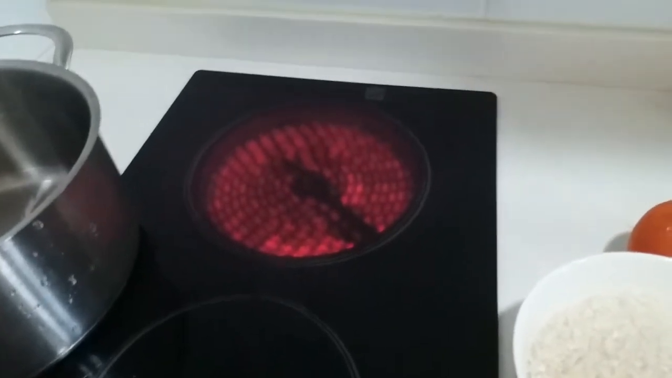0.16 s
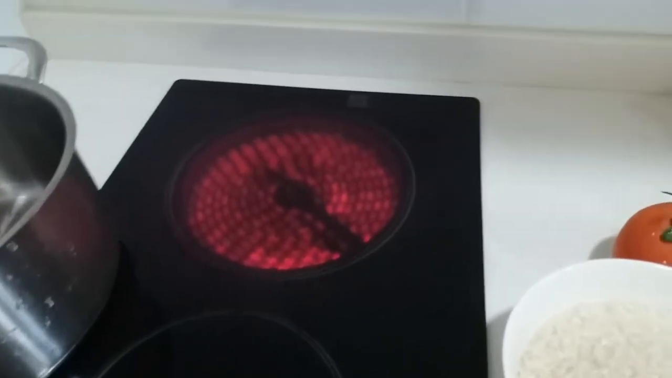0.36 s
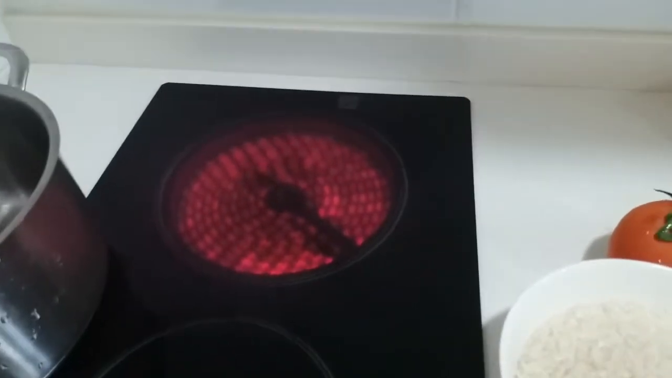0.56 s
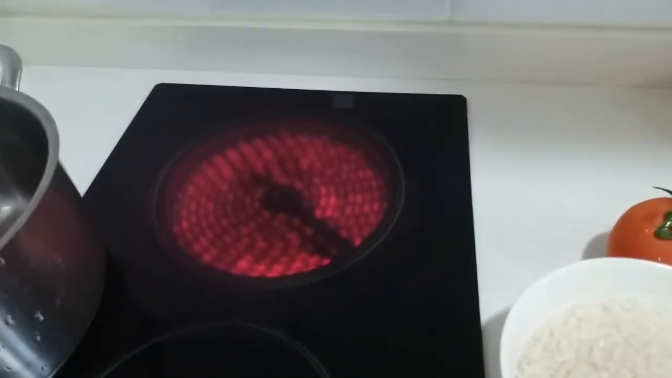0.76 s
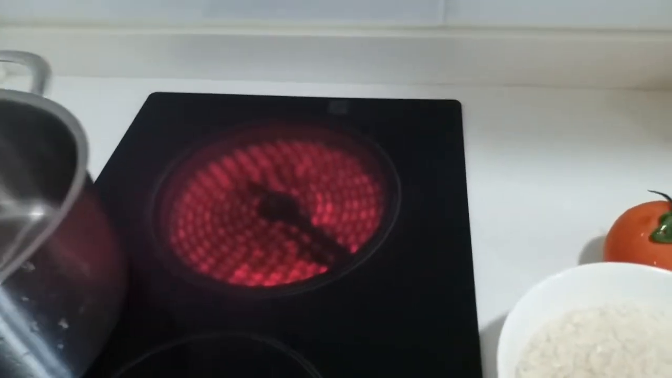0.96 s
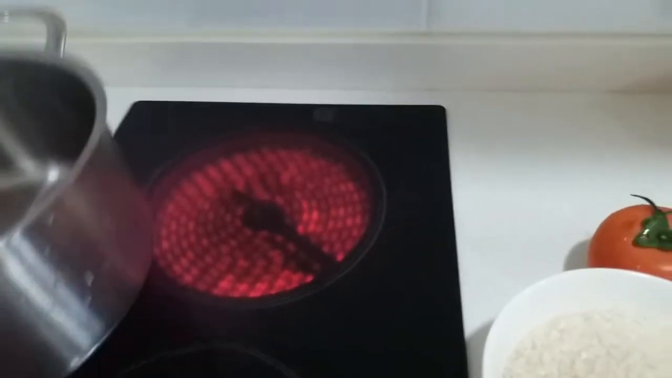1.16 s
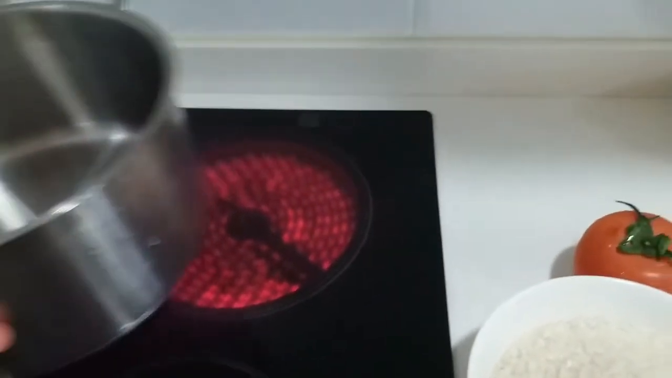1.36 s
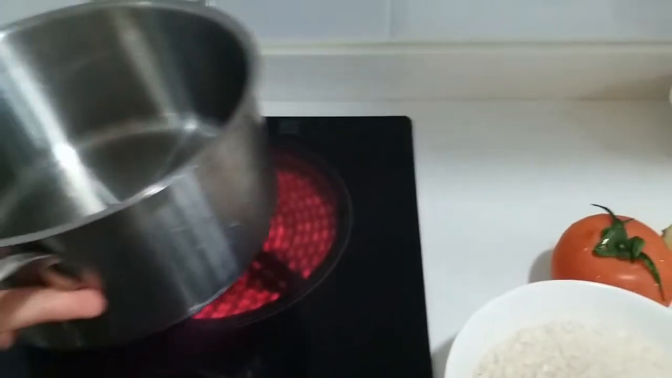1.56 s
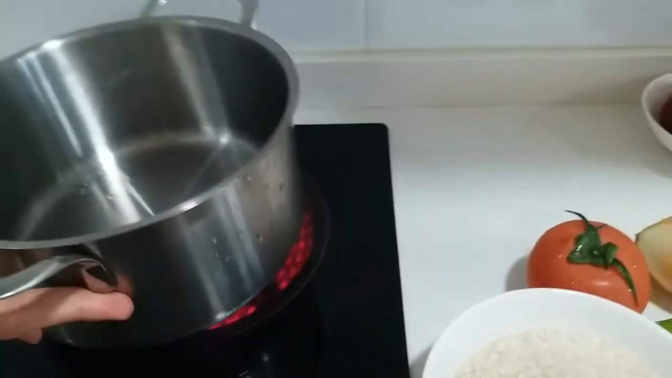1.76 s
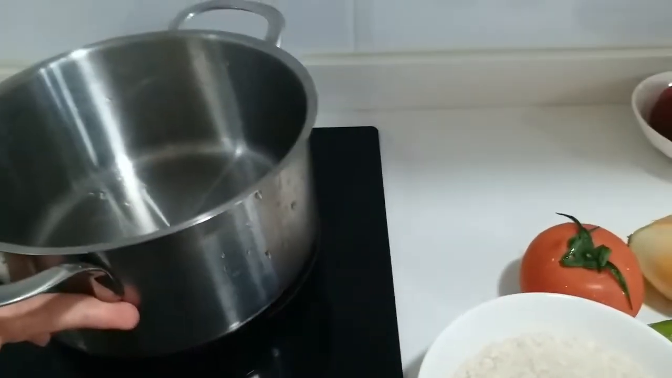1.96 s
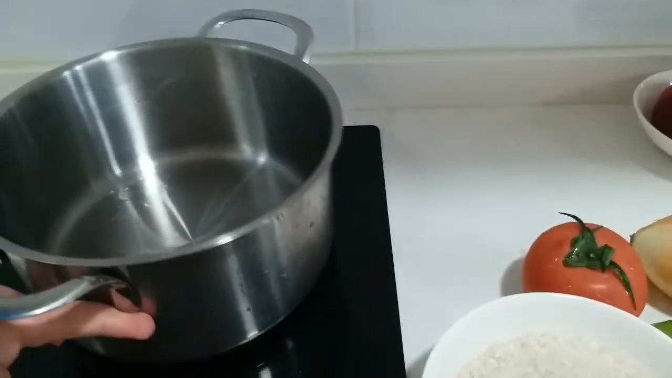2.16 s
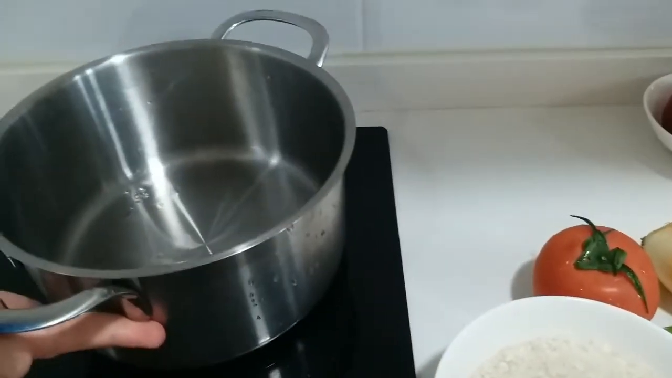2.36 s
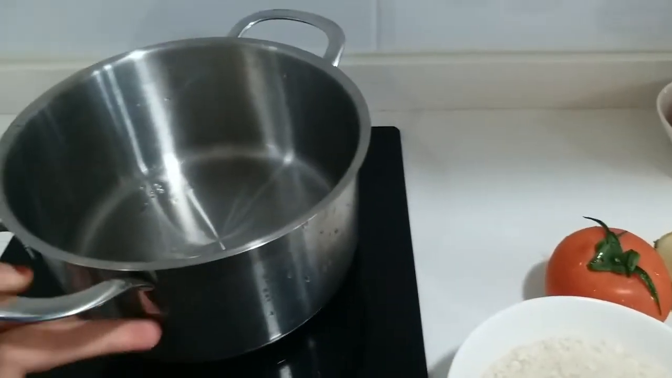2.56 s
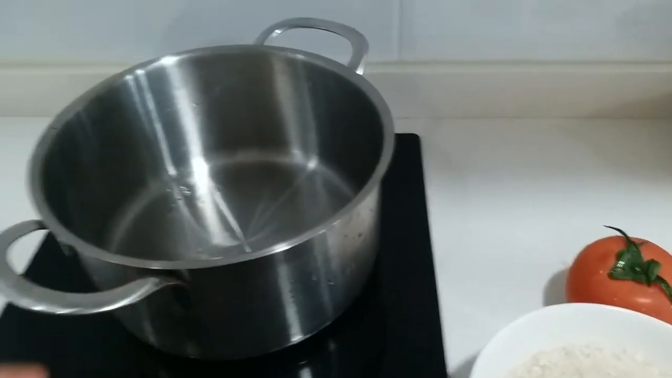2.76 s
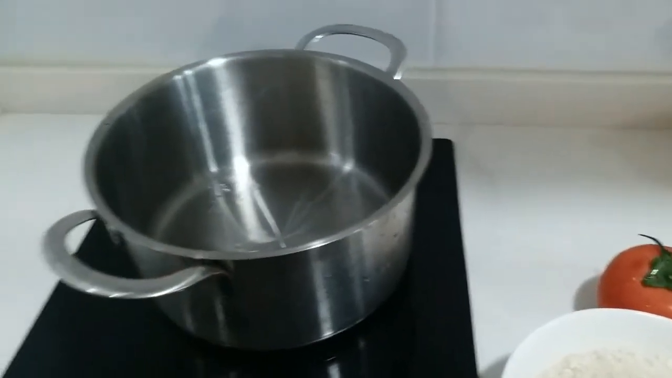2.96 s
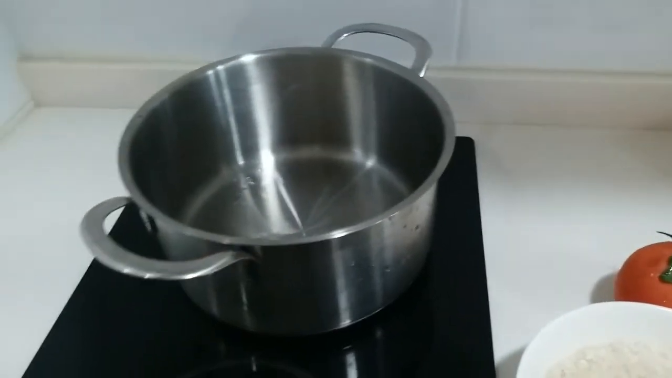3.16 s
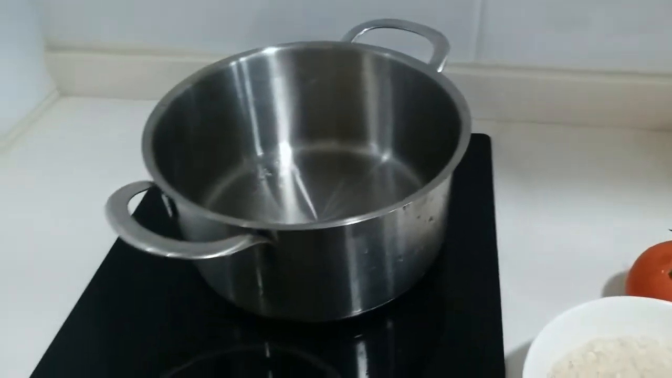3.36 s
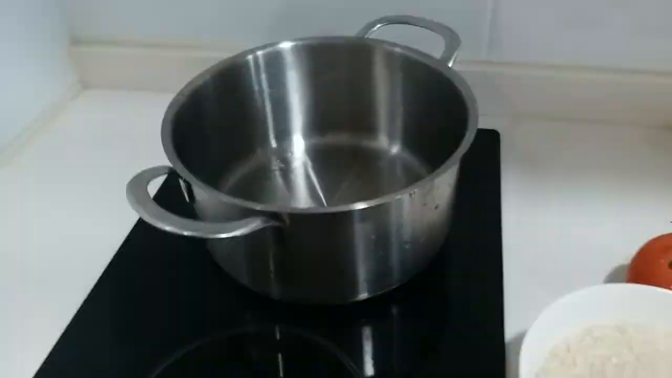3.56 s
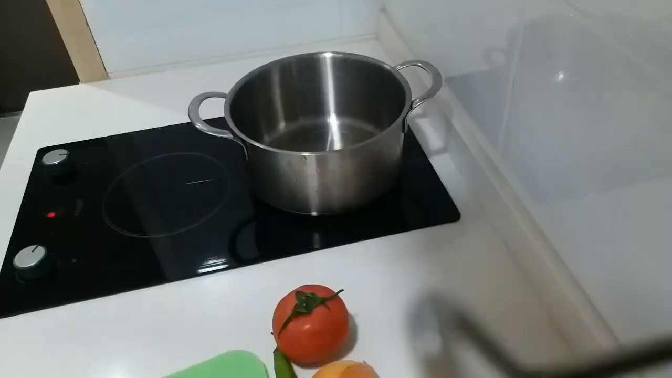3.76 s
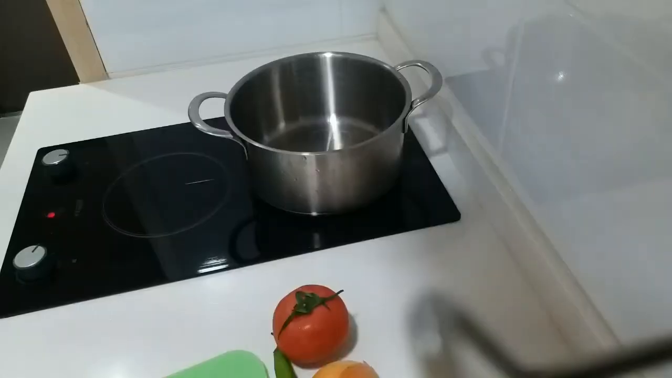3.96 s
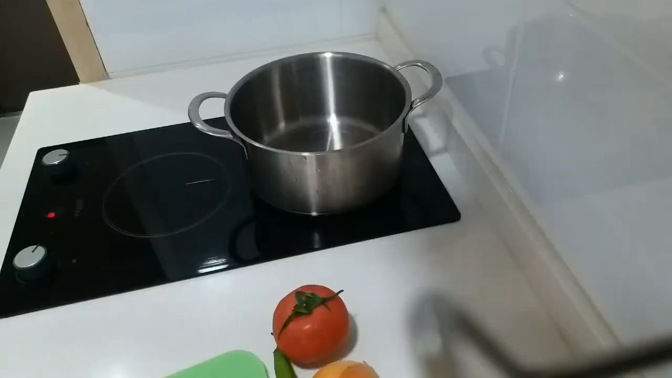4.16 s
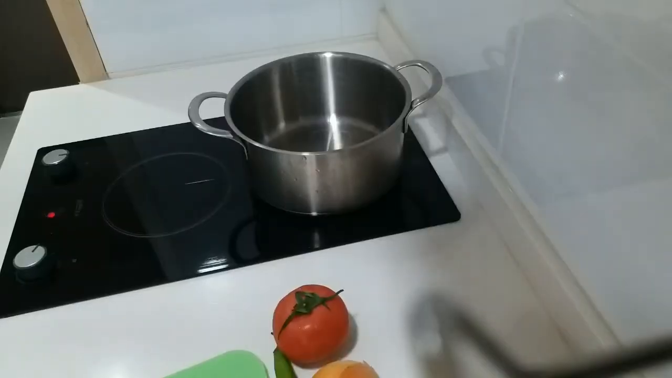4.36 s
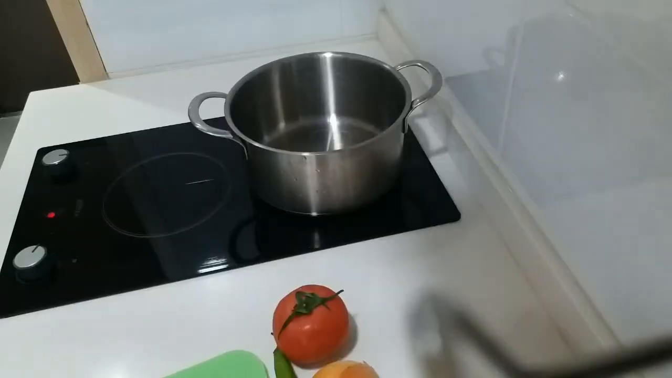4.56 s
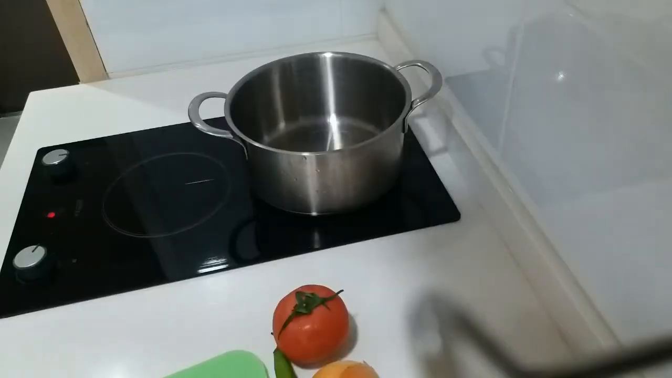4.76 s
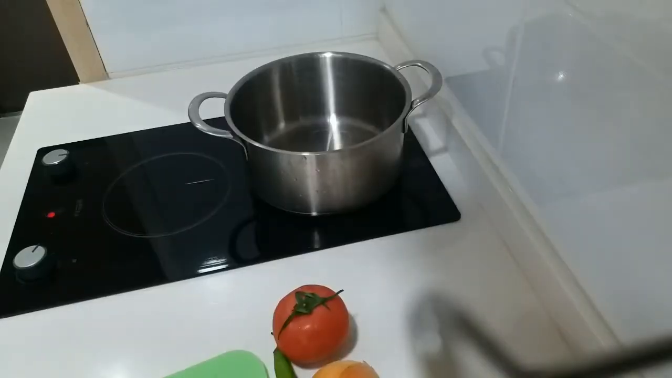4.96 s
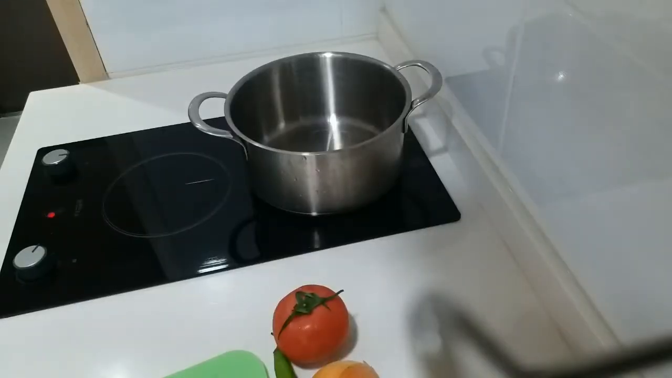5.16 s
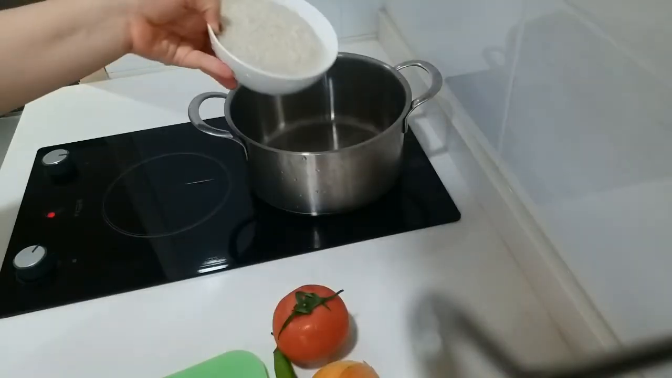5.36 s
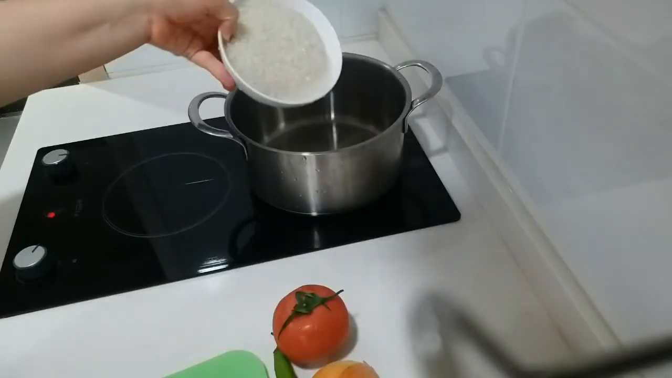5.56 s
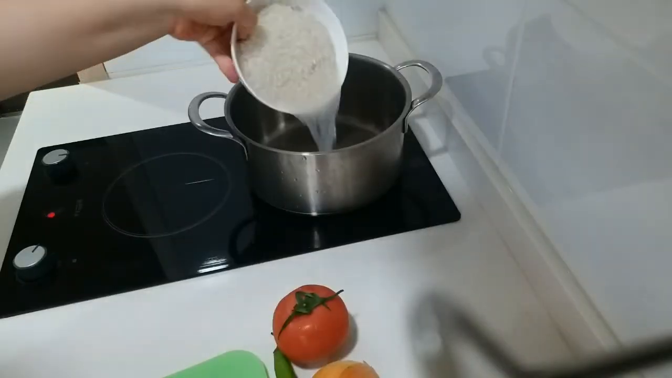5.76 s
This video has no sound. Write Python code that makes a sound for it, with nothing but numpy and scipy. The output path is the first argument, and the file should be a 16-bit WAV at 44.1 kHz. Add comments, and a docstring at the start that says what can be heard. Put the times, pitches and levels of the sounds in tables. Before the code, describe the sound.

A quiet kitchen with a low appliance hum and faint rumble is heard throughout, in stereo with a short room echo. At about 0.5 seconds, fingers brush and lightly tap the handle of an empty steel pot. From 0.8 to 1 second the pot drags over a glass hob with a short, jerky, ringing rasp, followed by faint clinks around 1.1 and 1.7 seconds. At 2.1 seconds it is set down with a loud clank that rings briefly. A very faint, dull knock comes at 3.1 seconds. Around 3.6 seconds the background grows slightly fuller, and something like a plastic packet crinkles and snaps, a little to the left, sharpest at 4.4 seconds and dying away by about 4.9. At 5.8 seconds dry rice starts pouring into the pot, a quickly thickening stream of tiny ticks that makes the steel ring until the end.

```python
"""A quiet kitchen with a low appliance hum. An empty steel pot is taken by the handle, dragged off a
glass hob in stick-slip friction and set down with a clank that excites its normal modes. Something,
probably a plastic packet, crinkles and snaps as its creases buckle. Then dry rice starts to pour from
a bowl, and a thickening stream of tiny impacts keeps the bare floor of the pot ringing."""
import sys
import numpy as np
from scipy import signal
from scipy.fft import rfft, irfft
from scipy.io import wavfile

SR = 44100
rng = np.random.default_rng(int(sys.argv[2]) if len(sys.argv) > 2 else 0)


def persist_wave(psi):
    """Save psi, clipped to +-1, as 16-bit WAV."""
    counts = np.round(np.clip(psi, -1, 1) * 32767).astype(np.int16)
    wavfile.write(sys.argv[1], SR, np.atleast_2d(counts).T)


N = 260190
TIME = np.arange(N) / SR
RING_TIME = TIME[:SR * 3 // 4]  # time axis of one impulse response
PACKET_PAN_DB = 3  # left minus right

# Coherence of the sound field. Each row: frequency in Hz, left-right correlation.
COHERENCE = [(60, 0.97), (130, 0.94), (440, 0.83), (700, .4), (1300, 0), (15000, 0.00074)]
# Reverberation of the kitchen. Each row: frequency in Hz, T60 (time to fall 60 dB) in seconds.
ROOM_T60 = [(200, 0.27), (1500, 0.26), (5000, 0.26), (14000, 0.19)]
# Modes of the pot's rim. Each row: frequency in Hz, relative level in dB, nominal T60 in seconds.
RIM_MODES = [(168, 13, 0.11), (386, 8.5, 0.074), (632, 3, 0.16), (1090, -1, 0.17), (1264, 3, 0.049),
             (2000, 4.5, 0.068), (2207, 1.5, 0.079), (2303, 0.5, 0.17), (2870, 2, 0.079), (3500, -7, 0.193),
             (4000, 1.5, 0.079), (5770, -6, 0.075)]
# Spectrum of a light touch on the pot. Each row: frequency in Hz, relative density in dB.
TOUCH_SPECTRUM = [(100, 0.5), (450, -1), (1400, -9.5), (3400, -14.5), (4100, -23), (5000, -16.5),
                  (6500, -19), (7500, -27), (14000, -24)]


def amp(db):
    """Amplitude ratio for a level in decibels."""
    return 10 ** (np.asarray(db) / 20)


def unit_rms(x):
    """Normalisation to a mean power of 1."""
    return x / np.sqrt(np.mean(x ** 2) + 1e-20)


def unit_energy(x):
    """Normalisation of each channel to an energy of 1."""
    return x / np.linalg.norm(x, axis=-1, keepdims=True)


def unit_attack(x):
    """Normalisation of an impact to rms 1 over its first 50 ms."""
    return x / np.sqrt(np.mean(x[:, :SR // 20] ** 2))


def at_frequency(points, hz):
    """Interpolation of a table on a logarithmic frequency axis."""
    freqs, values = np.transpose(points)
    return np.interp(np.log(hz + 1), np.log(freqs + 1), values)


def envelope(curve):
    """Gain interpolated in decibels between points in time, and zero outside them."""
    times, db = np.transpose(curve)
    return amp(np.interp(TIME, times, db)) * (TIME > times[0]) * (TIME < times[-1])


def swells(rows, rise_s, fade_db_per_s):
    """Sum of envelopes, each with a linear rise, a hold and an exponential decay."""
    gain = np.zeros(N)
    for start, held, db in rows:
        rise = np.clip((TIME - start) / rise_s, 0, 1)
        gain += rise * amp(db - fade_db_per_s * np.maximum(TIME - start - held, 0))
    return gain


def drift(bandwidth_hz):
    """Slow random modulation: low-passed noise of rms 1."""
    hz = np.fft.rfftfreq(N, 1 / SR)
    return unit_rms(irfft(rfft(rng.standard_normal(N)) * np.exp(-(hz / bandwidth_hz) ** 2), N))


def sides(db):
    """Left and right gains for a level difference."""
    return amp(np.array([[db], [-db]]) / 2)


def place(x, pan_db):
    """Diffraction: the bass bends round to both sides, so only the treble is panned."""
    bass = signal.sosfiltfilt(signal.butter(4, 420, fs=SR, output="sos"), x)
    return bass + sides(pan_db) * (x - bass)


def add(mix, start_s, sound):
    """Superposition of a stereo sound on the mix."""
    part = mix[:, round(start_s * SR):][:, :sound.shape[1]]
    part += sound[:, :part.shape[1]]


def convolve(x, response):
    """Output of a linear system, cut to the length of its input."""
    x = np.atleast_2d(x)
    return signal.fftconvolve(x, np.atleast_2d(response), axes=1)[:, :x.shape[1]]


def colour(x, spectrum, size=4096):
    """Minimum-phase filter of unit energy with the given spectral shape."""
    db = at_frequency(spectrum, abs(np.fft.fftfreq(size, 1 / SR)))
    log_gain = np.log(amp(np.maximum(db, -100)))
    taps = np.fft.ifft(np.exp(np.conj(signal.hilbert(log_gain)))).real
    return convolve(x, unit_energy(taps[:size // 2]))


def tilted(x, db_per_octave):
    """A spectral slope between 500 and 6000 Hz brightens or dulls a sound."""
    return colour(x, [(hz, db_per_octave * np.log2(hz / 500)) for hz in (500, 6000)])


def noise_pair(size):
    """Partly coherent white noise: left and right are alike in the bass, unrelated in the treble."""
    left, independent = rfft(rng.standard_normal((2, size)))
    coherence = np.clip(at_frequency(COHERENCE, np.fft.rfftfreq(size, 1 / SR)), -1, 1)
    right = coherence * left + np.sqrt(1 - coherence ** 2) * independent
    return irfft(np.array([left, right]), size)


def tail(t60s, size=256):
    """Diffuse decay: each band of noise dies exponentially at its own rate."""
    length = len(RING_TIME)
    hz, t, bands = signal.stft(noise_pair(length), SR, nperseg=size)
    fade = amp(-60 * t / at_frequency(t60s, hz)[:, None])
    return unit_energy(signal.istft(bands * fade, SR, nperseg=size)[1][:, :length])


def burst(decay_s):
    """A broadband transient: noise under an exponential decay."""
    return unit_energy(noise_pair(len(RING_TIME)) * np.exp(-RING_TIME / decay_s))


def ring(modes, sustain=1, uneven_db=2):
    """Free vibration as damped sines; the higher modes differ left and right in phase and level."""
    out = np.zeros((2, len(RING_TIME)))
    for hz, db, t60 in modes:
        coherence = np.clip(at_frequency(COHERENCE, hz), -1, 1)
        phase = np.arccos(coherence) * rng.choice([-1, 1]) * np.array([[.5], [-.5]])
        balance = sides(uneven_db * (1 - coherence) * rng.standard_normal())
        gain = amp(db) * balance * rng.choice([-1, 1])
        decay = np.exp(-np.log(1000) * RING_TIME / (t60 * sustain))
        out += gain * decay * np.sin(2 * np.pi * hz * RING_TIME + phase)
    return unit_energy(out)


def impulses(per_s, spread_db):
    """Shot noise: random impulses of uneven size, with mean power near 1."""
    sizes = unit_rms(amp(spread_db * np.minimum(rng.exponential(1, N), 4)))
    chance = per_s / SR
    return sizes * rng.choice([-1, 1], N) * (rng.random(N) < chance) / np.sqrt(chance)


def room_tone(early_db=-56.5, late_db=-53, fuller_at_s=3.62, fade_s=0.14, hiss_db=-81, swell_db=1):
    """Ambient noise: a low rumble that wavers a little, under a thin steady hiss; at 3.62 s the background
    turns louder and changes colour."""
    # Spectra of the early air, late air and hiss. Each row: frequency in Hz, relative density in dB.
    early_spectrum = [(15, -81.5), (25, -44.5), (92, -10), (102, -9), (123, -9), (161, -5), (185, -22),
                      (335, -15), (384, -29.5), (451, -20.5), (734, -35), (1480, -34.5), (2760, -40.5),
                      (3520, -50.5), (16000, -49.5)]
    late_spectrum = [(15, -36), (25, -54), (43, -17.5), (84, -15), (117, -3), (145, -9), (263, -11),
                     (317, -24.5), (384, -16.5), (463, -28), (607, -35), (2000, -46.5), (2760, -38),
                     (3620, -52.5), (16000, -51)]
    hiss_spectrum = [(1500, -45.5), (2300, -15), (2600, -0.5), (2850, 1), (3150, -20.5), (4000, -53)]
    late_share = np.clip((TIME - fuller_at_s) / fade_s + .5, 0, 1)
    air = np.sqrt(1 - late_share) * amp(early_db) * colour(noise_pair(N), early_spectrum)
    air += np.sqrt(late_share) * amp(late_db) * colour(noise_pair(N), late_spectrum)
    rumble = signal.sosfiltfilt(signal.butter(2, 500, fs=SR, output="sos"), air)
    waver = (amp(swell_db * drift(bandwidth_hz=32)) - 1) * rumble
    return air + waver + amp(hiss_db) * colour(noise_pair(N), hiss_spectrum)


def appliance_hum(waver_rad=.6, waver_db=3):
    """Two low tones waver under random phase and amplitude modulation."""
    # Tones of the hum. Each row: frequency in Hz, mean level in dB.
    tones = [(118.4, -54), (344.5, -69.5)]
    out = np.zeros(N)
    for hz, db in tones:
        phase = 2 * np.pi * hz * TIME + waver_rad * drift(bandwidth_hz=7)
        out += amp(db + waver_db * drift(bandwidth_hz=8)) * np.sin(phase)
    return out


def finger_slide():
    """Friction noise: skin hisses faintly along the steel handle."""
    # Strokes of the fingers. Each row: start in seconds, seconds until the decay, level in dB.
    strokes = [(.42, 0.057, -67), (.62, .1, -72)]
    # Spectrum of skin on steel. Each row: frequency in Hz, relative density in dB.
    skin_spectrum = [(1000, -6), (4300, -14), (5300, -3), (5900, -11), (6800, -22), (15000, -26)]
    return swells(strokes, rise_s=0.057, fade_db_per_s=250) * colour(noise_pair(N), skin_spectrum)


def handle_grip(ring_db=2, room_db=6.5):
    """Impact excitation: a hand takes the handle with light taps that ring its modes."""
    # Modes of the handle. Each row: frequency in Hz, relative level in dB, T60 in seconds.
    handle_modes = [(372, 12, 0.072), (945, 1, 0.17), (1180, -4, 0.1), (1535, -11, 0.28),
                    (2308, -3.5, 0.16), (3400, -15, 0.27), (3510, -7, 0.12), (5350, -9, 0.1),
                    (6100, -3, 0.075)]
    # Taps of the hand. Each row: start in seconds, level in dB.
    taps = [(0.46, -68.5), (.482, -51.5), (0.496, -51.5), (.541, -61.5)]
    out = np.zeros((2, N))
    for start, db in taps:
        contact = burst(decay_s=0.014) + amp(room_db) * tail(ROOM_T60)
        touch = unit_energy(colour(contact, TOUCH_SPECTRUM))
        add(out, start, amp(db) * unit_attack(amp(ring_db) * ring(handle_modes) + touch))
    return sides(db=4.0) * out


def rim_clinks(scuff_db=-5, contact_s=0.0039, fall_db_per_octave=15):
    """Selective excitation: as the pot lifts and shifts, soft touches ring the modes near one pitch."""
    # Touches on the pot. Each row: start in seconds, level in dB, most excited frequency in Hz.
    touches = [(.962, -58, 3570), (1.062, -63, 1080), (1.718, -69, 2340), (1.74, -66, 1110)]
    onset = 1 - np.exp(-RING_TIME / contact_s)
    out = np.zeros((2, N))
    for start, db, pitch in touches:
        modes = [(hz, mode_db - fall_db_per_octave * abs(np.log2(hz / pitch)), t60)
                 for hz, mode_db, t60 in RIM_MODES]
        rim = ring(modes, sustain=0.95)
        scuff = amp(scuff_db) * unit_energy(colour(tail(ROOM_T60), TOUCH_SPECTRUM))
        add(out, start, amp(db) * unit_attack((rim + scuff) * onset))
    return out


def pot_drag(ring_db=-1, rasp_db=-5, room_db=-2):
    """Stick-slip friction: the base jerks over the glass, and every slip rasps and rings the rim."""
    # Strength of the slipping. Each row: time in seconds, relative level in dB.
    slip_levels = [(.78, -67.5), (.86, -57), (.91, -47.5), (.965, -47.5), (.985, -90)]
    # Single catches of the base on the glass. Each row: time in seconds, impulse level in dB.
    catches = [(.912, -23.5), (.949, -16.5), (0.973, -25)]
    # Spectrum of the rasp. Each row: frequency in Hz, relative density in dB.
    rasp_spectrum = [(100, -23), (400, -5.5), (850, -13.5), (2300, -11.5), (3300, -17), (4000, -18),
                     (4500, -27.5), (5700, -21), (6500, -49), (15000, -38)]
    contact = burst(decay_s=0.0037) + amp(room_db) * tail(ROOM_T60)
    rasp = unit_energy(colour(contact, rasp_spectrum))
    slips = envelope(slip_levels) * impulses(per_s=1400, spread_db=-0.5)
    for start, db in catches:
        slips[round(start * SR)] += amp(db)
    return convolve(slips, amp(ring_db) * ring(RIM_MODES) + amp(rasp_db) * rasp)


def packet_crinkle(room_db=-4, tilt_db_per_octave=3.0, spots=4):
    """Crackling noise: each squeeze makes tiny creases tick at spots of differing brightness."""
    # Squeezes of the film. Each row: start in seconds, seconds until the decay, level in dB.
    squeezes = [(3.705, 0.32, -50.5), (4.24, 0.049, -55), (4.43, 0.036, -62)]
    # Spectrum of a tiny crease. Each row: frequency in Hz, relative density in dB.
    crease_spectrum = [(150, -6), (350, -3), (700, -12), (1300, -5.5), (1800, -8.5), (2600, -7.5),
                       (3800, -15.5), (5300, -12.5), (7500, -30.5), (10000, -20), (12500, -13.5),
                       (16000, -16)]
    effort = swells(squeezes, rise_s=0.035, fade_db_per_s=122)
    out = np.zeros((2, N))
    for tilt in np.linspace(-tilt_db_per_octave, tilt_db_per_octave, spots):
        crease = colour(burst(decay_s=0.0014) + amp(room_db) * tail(ROOM_T60), crease_spectrum)
        ticks = effort * impulses(per_s=190, spread_db=3.0)
        out += convolve(ticks, unit_energy(tilted(crease, tilt)))
    return place(out, PACKET_PAN_DB) / np.sqrt(spots)


def buckle(spread_s=0.0099, fall_db=4.8, aftercracks=5):
    """Buckling: a crease gives way in one crack and a few smaller ones just after."""
    out = burst(decay_s=0.0014)
    for lateness in rng.uniform(0.057, 1, aftercracks):
        add(out, lateness * spread_s, amp(-fall_db * lateness) * burst(decay_s=0.00045))
    return out


def packet_snaps(gain_db=13, early_db=2, room_db=2.0, fizz_boost_db=4):
    """Each buckling crease is followed by early reflections off worktop and wall, then reverberation."""
    # Snaps of the packet. Each row: start in seconds, relative level in dB,
    # relative level of the treble fizz in dB before its boost, tilt in dB per octave.
    snaps = [(3.573, -37.5, -32, -5), (3.817, -25, -9, -2), (3.832, -32, -12, -1.5), (3.856, -32, -9, 1),
             (3.866, -29.5, -12, -2), (3.924, -29.5, -5.5, .5), (3.939, -32.5, -24, 2),
             (4.015, -28.5, -3.5, 1), (4.131, -27.5, -16.5, -0.5), (4.174, -39.5, -9.5, .5),
             (4.219, -39, -10, 1), (4.255, -33.5, -10.5, 1), (4.283, -39, -2.5, 1.5),
             (4.298, -31.5, -11, 0.5), (4.340, -38.5, -5.5, .5), (4.376, -18, -13, 2.5),
             (4.441, -31, -14, 1), (4.681, -36.5, -4, 1.5), (4.76, -26.5, -15, 1.5), (4.871, -50.5, -12, 0),
             (5.171, -55.5, -25, 1)]
    # Spectrum of a snap. Each row: frequency in Hz, relative density in dB.
    snap_spectrum = [(120, -12.5), (260, 1), (450, 0.5), (700, -5), (980, -2.5), (1350, -2.5), (1750, -8),
                     (2200, -4.5), (2700, -7.5), (3800, -13), (5200, -14.5), (7500, -37.5), (12500, -15),
                     (16000, -25)]
    highpass = signal.butter(4, 8000, "high", fs=SR, output="sos")
    out = np.zeros((2, N))
    for start, db, fizz_db, tilt in snaps:
        crack = buckle() + amp(early_db) * burst(decay_s=0.013) + amp(room_db) * tail(ROOM_T60)
        crack = tilted(colour(crack, snap_spectrum), tilt)
        fizz = signal.sosfiltfilt(highpass, crack)
        snap = unit_energy(crack - fizz) + amp(fizz_db + fizz_boost_db) * unit_energy(fizz)
        add(out, start, amp(db + gain_db) * snap)
    return place(out, PACKET_PAN_DB)


def rice_pour(start_s=5.781, tip_s=0.13, growth=.8, stream_db=-26.5, ring_db=-4, room_db=-2):
    """Random impact excitation: hard grains tick on the steel and keep the pot's floor ringing."""
    # Spectrum of a grain's tick. Each row: frequency in Hz, relative density in dB.
    tick_spectrum = [(60, -16), (130, 1.5), (380, -15), (590, -5), (850, -17.5), (1200, -11.5),
                     (1700, -8.5), (2600, -10), (5200, -9), (6200, -16.5), (7700, -25), (10000, -13),
                     (12500, -7), (16000, -13)]
    # Modes of the pot's floor. Each row: frequency in Hz, relative level in dB, T60 in seconds.
    floor_modes = [(541, 3, 0.11), (611, -4.5, 0.39), (1196, -9, 0.32), (2268, 7.5, 0.18),
                   (2630, -2.5, 0.19), (3004, 0, 0.22), (3390, -3, .2), (4320, -7, 0.12)]
    grains_per_s, spots = 7500, 4
    # As the bowl tips, the stream's amplitude grows as a power of time.
    stream = amp(stream_db) * np.maximum((TIME - start_s) / tip_s, 0) ** growth
    out = np.zeros((2, N))
    for _ in range(spots):  # each landing spot has its own path to the listener
        contact = burst(decay_s=0.00055) + amp(room_db) * tail(ROOM_T60)
        tick = unit_energy(colour(contact, tick_spectrum))
        hits = stream * impulses(grains_per_s / spots, spread_db=-1.5)
        out += convolve(hits, tick + amp(ring_db) * ring(floor_modes))
    return sides(db=2.0) * out / np.sqrt(spots)


def pot_clank(shiver_db=-2, clatter_db=-7, contact_db=-8, ring_db=0.5):
    """Modal ringing: each blow cracks, rings the steel and shakes the glass; a soft blow is duller."""
    # Modes of the pot. Each row: frequency in Hz, relative level in dB, nominal T60 in seconds.
    pot_modes = [(119, -4, 0.55), (159, -7, 0.55), (314, -11, 0.47), (346, 0, 0.4), (577, -5, 0.33),
                 (640, -12, 0.42), (707, -5, 0.3), (1009, -9, 0.31), (1049, -1, 0.29), (1081, -6, 0.32),
                 (1380, -14, 0.51), (1430, -16, 0.42), (1461, -9, 0.29), (1638, -12, 0.35), (1698, -4, 0.4),
                 (1816, -7, 0.34), (1953, -6, 0.31), (1984, -7, 0.31), (2019, -8, 0.32), (2258, -9, 0.33),
                 (2292, -4, 0.29), (2369, -8, 0.33), (2742, -9, 0.3), (3031, -14, 0.31), (3394, -12, 0.27),
                 (3554, -7, 0.26), (4003, -13, 0.29), (5376, -19, 0.27), (6172, -24, 0.27),
                 (6458, -22, 0.22)]
    # Dense shiver of pot and glass between the modes. Each row: frequency in Hz, relative density in dB.
    shiver_spectrum = [(30, -33.5), (75, -4), (130, 0), (250, -9), (450, -5), (900, -10.5), (1400, -9),
                       (2100, -9), (3000, -12.5), (4300, -17.5), (4800, -26), (5900, -24), (7300, -42.5),
                       (12000, -31.5), (16000, -44.5)]
    # Decay of that shiver. Each row: frequency in Hz, T60 in seconds.
    shiver_t60 = [(60, .45), (250, 0.55), (1000, .31), (2500, 0.35), (6000, 0.33), (14000, 0.24)]
    # Blows. Each row: start in seconds, level in dB, tilt in dB per octave, left minus right in dB.
    blows = [(2.126, -20, 0, 4.5), (3.105, -67, -9, 11)]
    steel = amp(ring_db) * ring(pot_modes, sustain=0.93)
    out = np.zeros((2, N))
    for start, db, tilt, pan_db in blows:
        impact = amp(contact_db) * burst(decay_s=0.0023) + amp(clatter_db) * burst(decay_s=0.014)
        shiver = unit_energy(colour(impact + amp(shiver_db) * tail(shiver_t60), shiver_spectrum))
        clank = unit_attack(tilted(steel + shiver, tilt))
        add(out, start, amp(db) * place(clank, pan_db))
    return out


def scene():
    """Superposition of all sources, in stereo."""
    pot = handle_grip() + finger_slide() + pot_drag() + rim_clinks() + pot_clank()
    packet = packet_snaps() + packet_crinkle()
    return pot + packet + rice_pour() + room_tone() + appliance_hum()


def record(dry):
    """Band limiting by a linear-phase low-pass filter."""
    cutoff_hz = 15950
    lowpass = signal.firwin(511, cutoff_hz, window=("kaiser", 9), fs=SR)
    return signal.oaconvolve(dry, lowpass[None], "same")


dry = scene()
out = record(dry)
persist_wave(out)
```